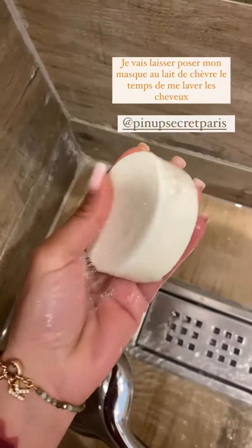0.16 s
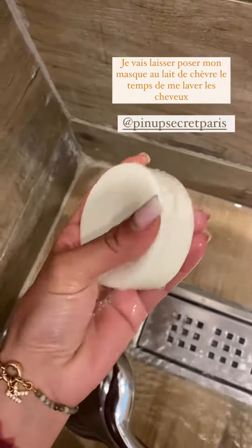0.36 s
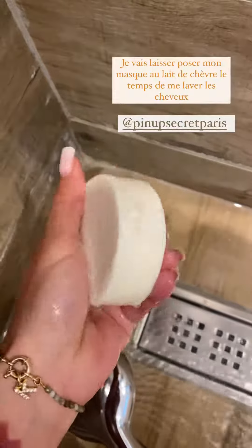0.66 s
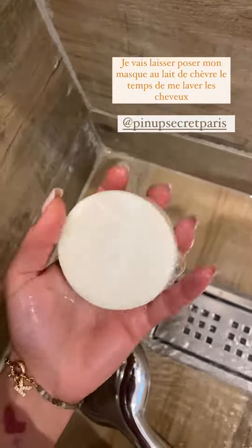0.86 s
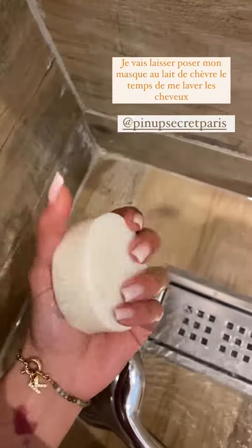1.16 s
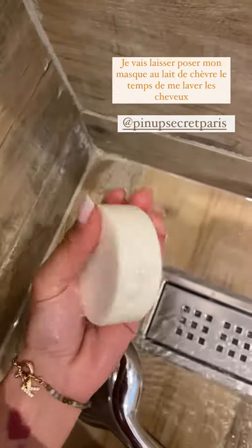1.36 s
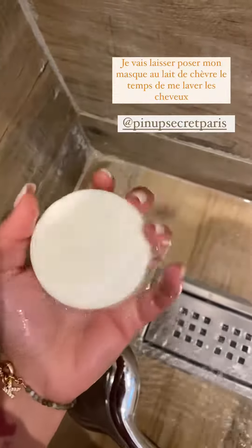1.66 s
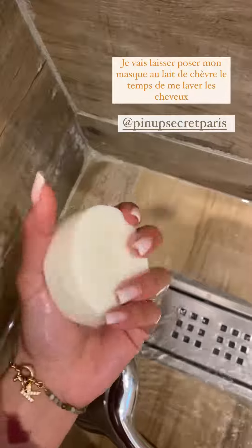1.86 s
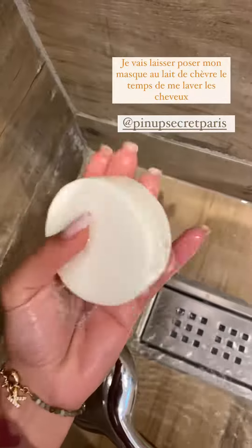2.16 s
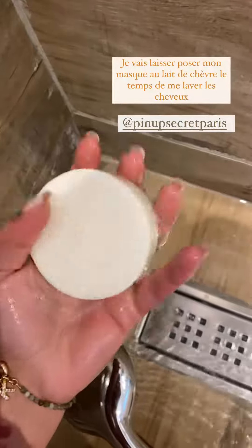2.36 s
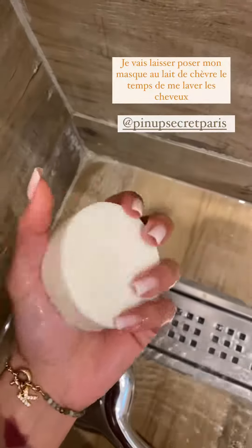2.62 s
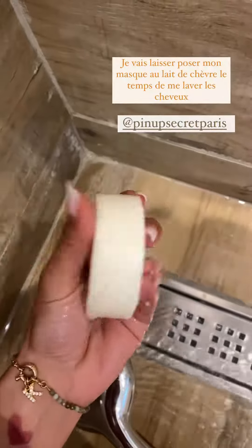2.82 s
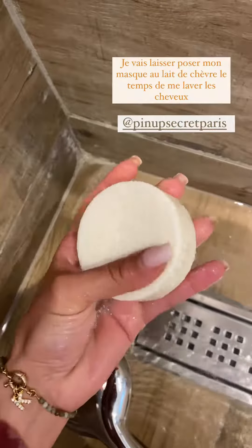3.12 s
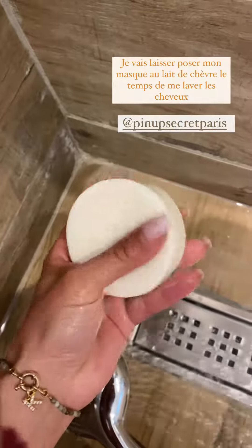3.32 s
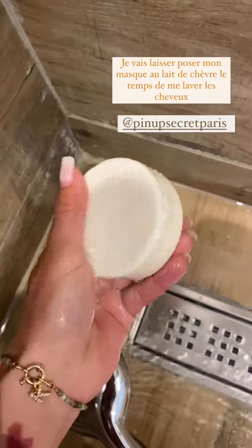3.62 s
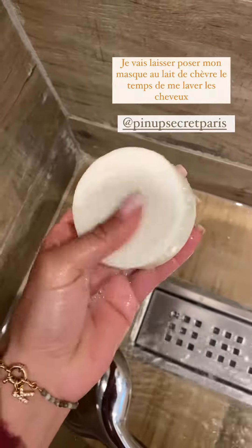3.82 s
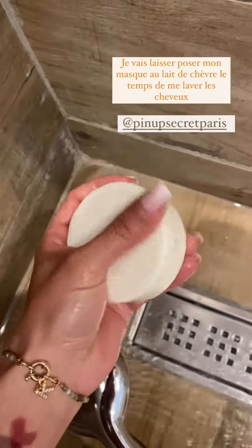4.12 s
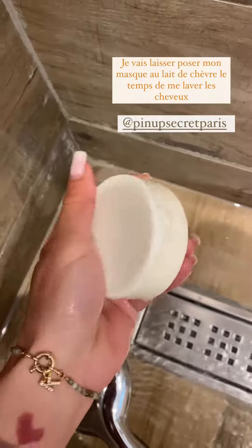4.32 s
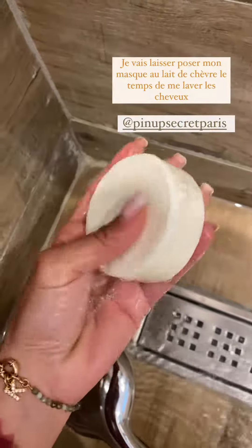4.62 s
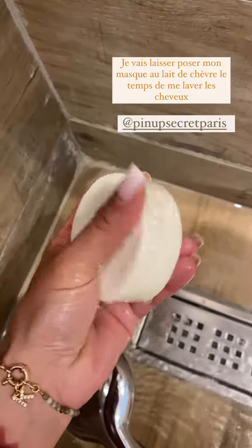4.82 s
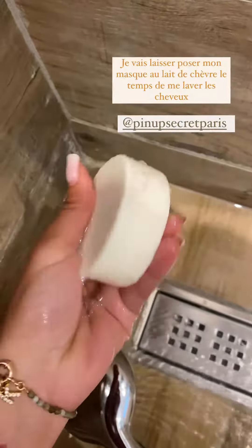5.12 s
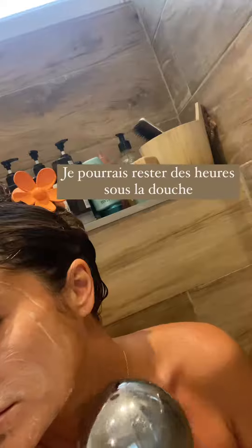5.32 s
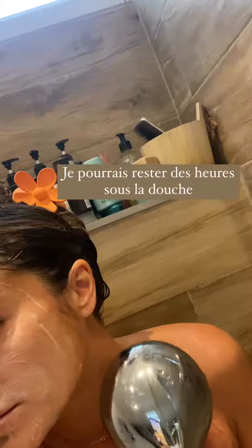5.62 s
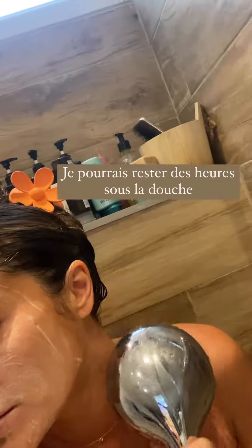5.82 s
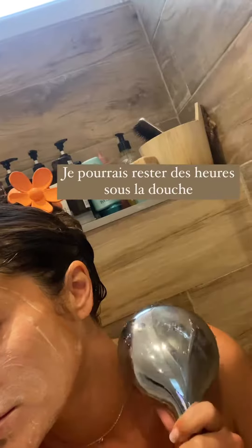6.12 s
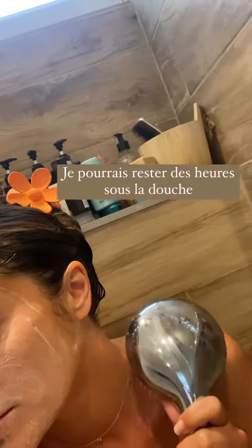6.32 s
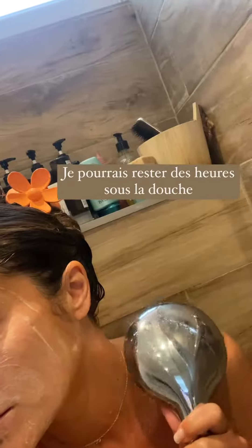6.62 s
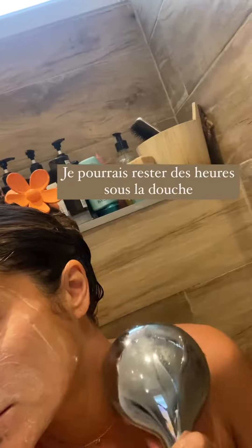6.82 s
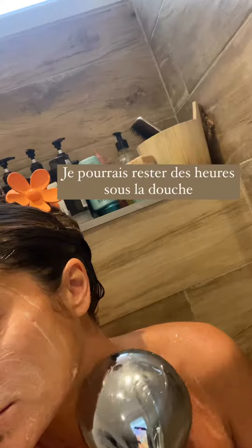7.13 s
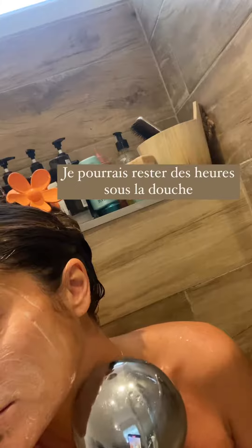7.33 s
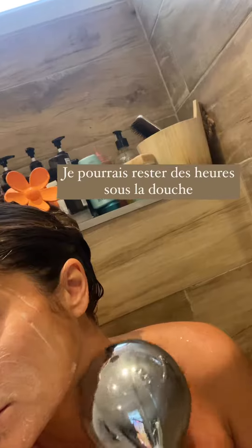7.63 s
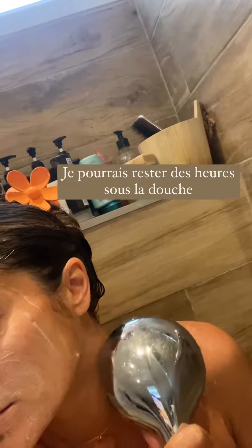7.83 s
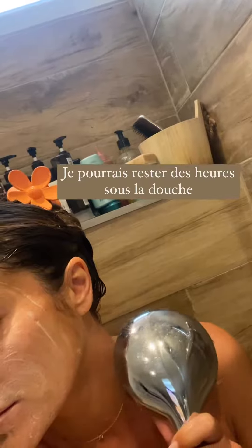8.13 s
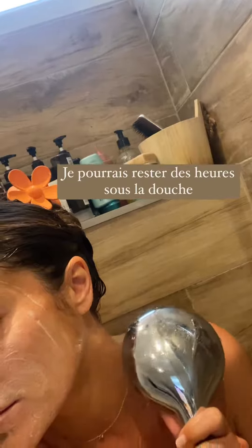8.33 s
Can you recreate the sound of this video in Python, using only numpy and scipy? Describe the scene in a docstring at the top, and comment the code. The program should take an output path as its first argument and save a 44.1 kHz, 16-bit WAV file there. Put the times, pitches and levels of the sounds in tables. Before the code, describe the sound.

A shower runs close to a phone in a tight, resonant bathroom stall. Dense, crisp hiss and drumming on the floor cut off sharply, restart almost at once and continue for several seconds. A second clean cut leads to water on a shoulder: less airy hiss, more mid-range patter, wet slaps, a bubbling pocket and brief rising gurgles until the abrupt end.

```python
"""Shower spray in a small tiled stall: random drop impacts and smooth noise excite the stall's resonances.
It drums on the floor; after a break it falls on skin, duller, with splats, gurgles and a bubbling pocket.
Splats are swarms of damped bubble chirps, gurgles gliding tones; the pocket and a drain cover ring as narrow
filtered noise. A phone with two microphone ports hears it. Each stretch stops abruptly with a very short
fading remnant, and the end of the floor stretch is also played ahead of it, before the first break."""
import sys
import numpy as np
from scipy import signal
from scipy.fft import rfft, irfft, next_fast_len
from scipy.io import wavfile
from scipy.ndimage import uniform_filter1d, map_coordinates

SR = 44100
rng = np.random.default_rng(int(sys.argv[2]) if len(sys.argv) > 2 else 0)


def persist_wave(psi):
    """Save psi, clipped to +-1, as 16-bit WAV."""
    counts = np.round(np.clip(psi, -1, 1) * 32767).astype(np.int16)
    wavfile.write(sys.argv[1], SR, np.atleast_2d(counts).T)


N = 373527

FLOOR_S, SKIN_S = (.8835, 5.187), (5.2715, 8.432)  # start and stop of each stretch (s)
AHEAD_S = 4.3886  # how much earlier the end of the floor stretch is first heard (s)
ZONE_HZ = (110, 900, 1700, 5000)  # borders of rumble | drumming | gurgle | spatter | hiss
TOP_HZ = 15680  # upper limit of the phone
SKIN_TOP_HZ = 5400  # slaps on the shoulder reach the phone without their treble
WANDER = 0.00252  # rms share by which the resonances slide as the hand-held phone moves
GRATE_HZ, GRATE_WIDTH_HZ = 3050, 62  # width at half amplitude
POCKET_HZ, POCKET_WIDTH_HZ = 1145, 56  # width at half amplitude
GURGLE_GLIDE = .06  # share by which the pitch rises over a bubble
# five values stand for the five zones: mean level (dB), then the share of the floor swell that each follows
FLOOR_DB, SKIN_DB = (-56.5, -43.5, -44.5, -39, -36), (-60, -43.5, -47.5, -38, -52.5)
FLOOR_FOLLOWS = (0.63, 0.07, 0.98, 0.25, 0.49)
# on skin each zone drifts (dB per s) and opens with a signed gush (dB) that settles (time constant in s)
SKIN_DRIFT_DB_S, GUSH_DB, GUSH_S = (5, 0.5, 1, -0.56, 0.2), (-3, 11.5, 1, -0.5, -13), 0.13

# Broad spectral colour between the resonances. Each row: frequency in Hz, density in dB, relative within a zone.
FLOOR_COLOUR = [(25, -103), (50, -91), (150, -89), (300, -76.5), (590, -88.5), (1000, -84.5), (2000, -87.5),
                (2800, -84.5), (5000, -74), (8500, -74.5), (9400, -80), (10000, -76.5), (12000, -85.5),
                (13500, -91.5), (15600, -104.2)]
SKIN_COLOUR = [(25, -99), (60, -83), (150, -91), (300, -100.7), (500, -91.5), (1500, -85), (2500, -73.5),
               (4500, -66), (5100, -73), (5900, -75), (6600, -85), (7300, -102), (8000, -108), (8700, -103),
               (10800, -111.4), (12000, -129.1)]
# Resonances of the stall heard from each place.
# Each row: frequency in Hz, half-power width in Hz, height in dB over the broad colour.
FLOOR_RESONANCES = [(86.3, 10.8, 28), (184, 7.8, 15.6), (231.7, 6.2, 15.6), (310.5, 10.3, 14.4),
                    (368.8, 11.3, 22.4), (433.8, 36, 23.2), (503, 14, 20.2), (650.6, 14.3, 23),
                    (774, 20, 22.7), (960, 11.3, 18.8), (1068, 23, 14.8), (1153.5, 47, 23.9), (1360, 16, 4),
                    (1404, 23, 16.2), (1500, 21, 20.8), (1681, 31, 19.4), (1620, 61, 15), (1820, 37, 18),
                    (2520, 340, 16.6), (2977, 15, 14.5), (3080, 23, 19), (3270, 180, 10), (3646, 137, 11),
                    (4124, 9.2, 16.7), (4220, 12, 16.3), (4348, 58, 15.4), (4867, 39, 13.8),
                    (5630, 53, 10.7), (5940, 380, 10.2), (6950, 43, 14), (7156, 31, 17), (7400, 320, 13.3),
                    (9095, 350, 12.8)]
SKIN_RESONANCES = [(189, 8.3, 19.8), (266, 17, 21.2), (390, 82, 20.2), (486.3, 13, 27.1), (561.8, 12, 26.3),
                   (632, 13.5, 20.2), (792.7, 26, 25), (929, 11, 23.2), (1031, 12, 30.5), (1148, 124, 21.6),
                   (1360, 38, 18.7), (1465, 74, 18.3), (1791, 23, 18.7), (2130, 127, 10.3), (2640, 72, 2.9),
                   (4150, 130, 5.4)]
# Relation of the two ports.
# Each row: frequency in Hz, left minus right in dB, likeness from 0 to 1, lead of the left in radians.
FLOOR_PORT_PAIR = [(40, -3.0, 0.95, -0.4), (150, -5.3, 0.92, -0.5), (240, -9.0, 0.99, -0.4),
                   (340, -14.2, 0.86, -0.9), (410, -6, 0.62, -3.5), (440, -9, 0.78, -4.6),
                   (520, 2.0, 0.9, -3.4), (670, -5.6, 0.92, -3.5), (800, -4.7, 0.81, -4.7),
                   (860, -0.9, 0.68, -3.7), (1030, 5.0, 0.54, -10.8), (1140, -2.0, 0.65, -9.4),
                   (1360, 2.4, 0.74, -11.4), (1940, -1.3, 0.62, -11.9), (2540, -0.5, 0.7, -9.8),
                   (4390, -2.9, 0.63, -10.9), (5280, -1.8, 0.68, -6.4), (10920, 0.8, 0.6, -3.5),
                   (11990, -0.2, 0.9, 1.0)]
SKIN_PORT_PAIR = [(40, 0.0, 0.99, 0.0), (240, 2.6, 0.97, -0.6), (340, 0.8, 0.93, -0.6),
                  (470, 3.6, 0.98, -0.8), (600, -0.5, 0.95, -0.6), (840, 4.2, 0.9, -0.8),
                  (990, 2.6, 0.47, -0.2), (1180, 3.4, 0.66, -2.4), (1290, -1.0, 0.53, -0.9),
                  (2150, 1.5, 0.73, -1.2), (2560, 1.2, 0.38, -1.4), (6160, -0.2, 0.87, -3.1),
                  (9580, 0.1, 0.9, -5.5)]
# Run-off water slapping down. Each row: peak in seconds, level in dB, bubble pitch in Hz, build-up in seconds,
# decay by 60 dB in seconds, pitch scatter as a share.
SPLAT_EVENTS = [(5.297, -21.5, 2350, 0.004, 0.15, 0.069), (5.337, -19.5, 2360, 0.00202, 0.088, 0.096),
                (5.404, -20, 2700, .003, 0.11, 0.16), (5.415, -13, 3140, .004, .15, 0.19),
                (5.447, -21, 2970, 0.0069, 0.2, 0.098), (5.510, -12, 3600, 0.0018, 0.13, 0.24),
                (5.523, -25, 3650, .002, .12, 0.077), (5.571, -24, 2200, .004, .1, 0.077),
                (5.766, -18, 3730, 0.0029, 0.2, 0.23), (5.802, -14, 2860, .002, 0.12, 0.18),
                (5.817, -16, 2960, .002, .15, 0.1), (5.843, -27, 2850, 0.0048, 0.14, 0.11),
                (5.951, -25.5, 2320, 0.0035, 0.12, .08), (5.997, -18.5, 4100, 0.0036, 0.1, 0.09),
                (6.026, -25, 3050, .002, .08, 0.093), (6.06, -23, 4130, .006, 0.13, .06),
                (6.122, -28, 4300, .003, .12, .08), (6.176, -28, 2150, .003, .1, 0.073),
                (6.19, -26, 4000, .002, .06, 0.087), (6.257, -25, 3750, .002, .1, 0.11),
                (6.428, -16, 3420, 0.0025, 0.13, 0.28), (6.552, -16.5, 4340, .004, 0.079, 0.07),
                (6.665, -13.5, 2610, 0.0012, .12, 0.084), (6.681, -20, 2400, 0.0028, 0.22, 0.072),
                (6.751, -16.5, 2850, 0.0036, .15, 0.23), (6.864, -29, 2000, 0.0016, .06, 0.05),
                (6.905, -25, 4200, .004, 0.22, .08), (6.995, -17.5, 2830, 0.0033, .25, 0.058),
                (7.091, -21.5, 2480, 0.00197, 0.093, .1), (7.411, -27, 4290, .002, 0.11, .1),
                (7.542, -23, 4270, .002, 0.12, 0.088), (7.643, -15, 3120, 0.0016, 0.19, 0.26),
                (7.682, -31, 1900, .002, 0.095, 0.09), (7.762, -23, 4200, .002, .15, 0.082),
                (7.839, -19.5, 3700, .002, 0.12, 0.17), (7.868, -24, 2820, .002, 0.079, 0.1),
                (7.888, -26, 3560, .003, .14, 0.25), (8.002, -20, 3800, 0.0032, .15, 0.165),
                (8.268, -18, 3220, .004, .13, 0.085)]
# Ringing of the metal drain cover under the spray. Each row: time in seconds, level in dB.
GRATE_LEVELS = [(.9, -50), (1.4, -47), (1.9, -48), (2.5, -49.5), (3.0, -48), (3.3, -43.5), (3.45, -43),
                (3.57, -40), (3.7, -46), (3.9, -41.5), (4.4, -47), (4.9, -46.5), (5.18, -51)]
# Bubbling of a pocket of water between head and skin. Each row: time in seconds, level in dB.
POCKET_LEVELS = [(5.9, -68), (6.2, -51), (6.45, -50), (6.56, -49), (6.61, -47), (6.66, -45), (7.0, -53),
                 (7.3, -53), (7.6, -60), (7.8, -48), (8.0, -51), (8.3, -49), (8.43, -53)]
# Swell of the spray on the floor. Each row: time in seconds, level in dB about the mean.
FLOOR_SWELL_LEVELS = [(.9, 0.5), (2.2, 1.6), (3.5, 3), (4.3, 2.5), (5.17, 1.5)]
# Low zones on the floor. Each row: time in seconds, rumble in dB, drumming in dB, both added to mean and swell.
FLOOR_LOW_LEVELS = [(.9, -1.5, 1.3), (1.5, 0, 2), (2.0, -2, -2.5), (2.3, -2.5, -3.5), (2.5, -0.5, 1.2),
                    (3.1, -1, 0.5), (3.3, 6, 1.5), (3.7, 4, 0.5), (4.1, -1.8, -0.4), (4.5, 6, 0),
                    (4.9, 8, -0.6), (5.17, -6.5, 1.1)]
# Lower zones on skin. Each row: time in seconds, rumble, drumming and gurgle in dB about the drift.
SKIN_LOW_LEVELS = [(5.3, -1, -4, 2), (5.57, -3, 2, 0.5), (5.85, -1, 1.2, 2.5), (6.13, -3, 0.5, 2.5),
                   (6.4, -5, -0.5, 0.5), (6.61, -7.5, -3, 3), (7.05, -1, 2.1, 2), (7.3, -2, -1, 2),
                   (7.6, -3, 0.5, 1.5), (8.1, -7, 0, 1.5), (8.43, 3, -1.5, 2)]
# Upper zones on skin. Each row: time in seconds, spatter and hiss in dB about the drift.
SKIN_HIGH_LEVELS = [(5.28, 1, 6), (5.5, 0.5, 1.5), (5.75, 2, -5), (5.95, 1, 2), (6.2, -1, 0.5),
                    (6.45, -1, 2.5), (6.7, -0.5, 0), (6.95, 1.5, 1), (7.2, 0.5, 1), (7.45, -0.5, -3),
                    (7.7, 0.5, -1.5), (7.95, 0.5, 1.5), (8.2, 0.5, -0.5), (8.43, -0.5, 2)]
# Big bubbles bursting out of the pocket. Each row: middle in seconds, level in dB, pitch in Hz, length in seconds.
GURGLE_EVENTS = [(5.295, -30.5, 765, .05), (5.35, -35, 700, .05), (6.548, -32, 1180, .03),
                 (6.578, -34, 1114, 0.032), (6.608, -25, 1142, 0.045), (6.722, -31, 1107, 0.07)]


def amp(db):
    """Level and amplitude: 20 dB is a factor of ten."""
    return 10 ** (np.asarray(db) / 20)


def axes(span):
    """Sampling: a stretch of n samples has n / 2 + 1 frequencies; returns n, Hz and seconds."""
    n = next_fast_len(int((span[1] - span[0]) * SR) + 2) // 2 * 2
    return n, np.arange(n // 2 + 1) * SR / n, span[0] + np.arange(n) / SR


def walk(n, rate):
    """Slow random modulation: levels held for 1 / rate s and smoothed twice, with unit spread."""
    hold = int(SR / rate)
    levels = np.repeat(rng.standard_normal(n // hold + 2), hold)
    slewed = uniform_filter1d(uniform_filter1d(levels, hold), hold)[:n]
    return slewed / slewed.std()


def ports(direct, diffuse, hz, table):
    """Partial coherence: the right port hears a shifted share of the left plus its own reverberant field."""
    f, *columns = np.transpose(table)
    pan_db, like, lead = (np.interp(hz, f, c) for c in columns)
    left_power = 1 / (1 + amp(-pan_db) ** 2)
    right = like * np.exp(-1j * lead) * direct + np.sqrt(1 - like ** 2) * diffuse
    return np.array([np.sqrt(left_power) * direct, np.sqrt(1 - left_power) * right])


def place(x, span, left_db=-15, fade_db_s=1500, faint_db=-42, faint_db_s=300):
    """Gating: a sharp start, and at the stop a remnant of two decays, the fainter one slower."""
    out, i = np.zeros((2, N)), int(span[0] * SR)
    n = int((span[1] - span[0]) * SR)
    tail = min(int(.05 * SR), N - i - n)
    opening = np.arange(n) / 40
    closing = np.arange(n)[::-1] / 40 + amp(left_db)
    out[:, i:i + n] = x[:, :n] * np.minimum(opening, closing).clip(0, 1)
    t = np.arange(tail) / SR
    remnant = amp(left_db - fade_db_s * t) + amp(faint_db - faint_db_s * t)
    out[:, i + n:i + n + tail] = x[:, n - tail:n] * remnant
    return out


def ringing(span, centre_hz, width_hz, curve, table, puff_db=1.5):
    """Resonance: noise through one narrow peak rings at its pitch, here in uneven puffs."""
    n, hz, t = axes(span)
    peak = 1 / (1 + (2 * (hz - centre_hz) / width_hz) ** 2)
    direct, diffuse = rfft(rng.standard_normal((2, n))) * peak
    x = irfft(ports(direct, diffuse, hz, table), n)
    level_db = np.interp(t, *np.transpose(curve)) + puff_db * walk(n, 25.08)
    return x / x.mean(axis=0).std() * amp(level_db)


def drain_cover():
    """Forced vibration: the spray keeps the metal drain cover ringing."""
    return ringing(FLOOR_S, GRATE_HZ, GRATE_WIDTH_HZ, GRATE_LEVELS, FLOOR_PORT_PAIR)


def water_pocket():
    """Cavity resonance: a pocket of water between head and skin bubbles around one pitch."""
    return ringing(SKIN_S, POCKET_HZ, POCKET_WIDTH_HZ, POCKET_LEVELS, SKIN_PORT_PAIR)


def gurgles(span, table):
    """Bubble oscillation: each big bubble is a swelling and fading tone that rises as it surfaces."""
    n, hz, t = axes(span)
    x = np.zeros(n)
    for s, db, pitch_hz, length in GURGLE_EVENTS:
        u = np.clip((t - s) / length, -.5, .5)
        swell = np.cos(np.pi * u) ** 2
        cycles = pitch_hz * length * u * (1 + GURGLE_GLIDE * u / 2)
        x += amp(db) * swell * np.sin(2 * np.pi * cycles)
    return irfft(ports(rfft(x), 0, hz, table), n)


def splat(hz, rise, t60, scatter, chance, cycles=6.1, glide=0.022, blow_db=-1.5, tail_db=-4):
    """Bubble entrainment: a slap strikes a swarm of upward-chirping bubbles that builds and dies away."""
    t = np.arange(400) / SR
    late, pitch, size = chance.T[:, :, None]
    at = np.linspace(-1.5 * rise, 0.38 * t60, len(chance))[:, None] + 0.0025 * late
    at[0], pitch[0], size[0] = 0, 0, 0  # the blow itself
    f = hz * np.exp(scatter * np.clip(pitch, -1.7, 1.7))
    envelope = np.clip(t * f / 1.9, 0, 1) * np.exp(-t * f / cycles)
    envelope = envelope * np.cos(np.pi / 2 * t / t[-1])  # ends at silence
    bubbles = envelope * np.sin(2 * np.pi * f * t * (1 + glide * t * f / cycles))
    course = np.where(at < 0, np.exp(at / max(rise, .001)), amp(-60 * at / t60))
    level = amp(tail_db + 3.9 * np.minimum(size, 1.5)) * course
    level[0] = amp(blow_db)
    out = np.zeros(int(.3 * SR))
    # the blow starts 30 ms in, leaving room for the build-up
    index = (np.clip(at + .03, 0, .28) * SR).astype(int) + np.arange(len(t))
    np.add.at(out, index, bubbles * level)
    return out


def splats(rows, span, table, top_hz):
    """Superposition: all slaps of a stretch add up, lose their treble and reach the two ports."""
    n = next_fast_len(int((span[1] - span[0] + .4) * SR)) // 2 * 2
    dry, hz = np.zeros((2, n)), np.arange(n // 2 + 1) * SR / n
    chance = rng.standard_normal((len(rows), 2, 72, 3))  # 72 bubbles, drawn apart for direct and diffuse
    for (s, db, pitch_hz, rise, t60, scatter), pair in zip(rows, chance):
        i = int((s - span[0]) * SR)
        for k in range(2):
            slap = splat(pitch_hz, rise, t60, scatter, pair[k])
            dry[k, i:i + len(slap)] += amp(db) * slap
    dull = 1 / (1 + (hz / top_hz) ** 12)
    direct, diffuse = rfft(dry) * dull
    return irfft(ports(direct, diffuse, hz, table), n)[:, int(.032 * SR):]  # brings the peaks to their times


def stray(span, per_s, db, hz, spread_db=2.5, t60=0.14, scatter=0.1):
    """Random arrivals: rows of small slaps at chance times, levels and pitches within an octave."""
    length = span[1] - span[0]
    chance = rng.random((int(per_s * length), 3))
    return [(span[0] + when * length, db - spread_db * np.log(size + 0.043), hz * 2 ** (pitch - .5),
             .003, t60, scatter) for when, size, pitch in chance]


def colour(hz, tilt, modes):
    """Minimum phase: a broad tilt with resonance peaks made causal by folding its cepstrum."""
    tilt = np.array(tilt)
    power = 1 + sum(amp(db) ** 2 / (1 + (2 * (hz - f) / w) ** 2) for f, w, db in modes)
    broad = amp(np.interp(np.log(hz + 1), np.log(tilt[:, 0]), tilt[:, 1]))
    cepstrum = irfft(np.log(broad * np.sqrt(power)))
    cepstrum[1:len(cepstrum) // 2] *= 2
    cepstrum[len(cepstrum) // 2 + 1:] = 0
    return np.exp(rfft(cepstrum))


def drops(n, per_s, spread_db, share):
    """Shot noise: uneven drop impacts over the smooth wash of far ones, in two unrelated draws."""
    size = amp(spread_db * np.minimum(rng.exponential(size=(2, n)), 4))  # limits the loudest single impacts
    hits = (rng.random((2, n)) < per_s / SR) * rng.choice([-1, 1], (2, n)) * size
    wash = rng.standard_normal((2, n))
    return np.sqrt(share) * hits / hits.std() + np.sqrt(1 - share) * wash


def steady(x, over_s=0.33):
    """Level normalisation: both channels scaled so that their mean keeps rms 1 in the long run."""
    return x / np.sqrt(uniform_filter1d(x.mean(axis=0) ** 2, int(over_s * SR)))


def floor_flow(t):
    """Source strength on the floor: zone levels in dB from a common swell and the wander of the low zones."""
    s, *lows = np.transpose(FLOOR_LOW_LEVELS)
    swell = np.interp(t, *np.transpose(FLOOR_SWELL_LEVELS))
    db = np.array(FLOOR_DB)[:, None] + np.outer(FLOOR_FOLLOWS, swell)
    db[:2] += [np.interp(t, s, c) for c in lows]
    return db


def skin_flow(t):
    """Source strength on skin: zone levels in dB from a drift, an opening gush and the wander of each zone."""
    db = np.array(SKIN_DB)[:, None] + np.outer(SKIN_DRIFT_DB_S, t - np.mean(SKIN_S))
    db += np.outer(GUSH_DB, np.exp(-(t - SKIN_S[0]) / GUSH_S))
    s, *lows = np.transpose(SKIN_LOW_LEVELS)
    db[:3] += [np.interp(t, s, c) for c in lows]
    s, *highs = np.transpose(SKIN_HIGH_LEVELS)
    db[3:] += [np.interp(t, s, c) for c in highs]
    return db


def dapple(x, depth_db, from_hz=1800):
    """Modulation in time and frequency: narrow strips, mostly above from_hz, dip briefly and separately."""
    hz, _, z = signal.stft(x, SR, nperseg=1024)
    field = uniform_filter1d(rng.standard_normal(z.shape[1:]), size=5, axis=1)
    field = uniform_filter1d(field, size=2, axis=0)
    treble = 1 / (1 + (from_hz / (hz[:, None] + 1)) ** 4)
    gain = amp(depth_db * np.minimum(field / field.std(), .6) * treble)
    gain = gain / np.sqrt(np.mean(gain ** 2, axis=1, keepdims=True))
    return signal.istft(z * gain, SR, nperseg=1024)[1]


def spray(span, flow, tilt, modes, table, surge_db, patchy_db, flicker_db, share):
    """Excited resonances: drops ring the stall; bands surge together, in patches and alone as jets wander."""
    n, hz, t = axes(span)
    direct, diffuse = rfft(drops(n, 6000, 3.0, share)) * colour(hz, tilt, modes)
    wet = ports(direct, diffuse, hz, table)
    zones = np.zeros((len(ZONE_HZ) + 1, 2, n))
    octave = np.log2(hz + 1)

    def coarse(rate):
        """Decimation: a slow walk needs only every 32nd sample."""
        return walk(n, rate)[::32]

    surge, patch = coarse(11.0), coarse(6.5)
    for centre in np.arange(4, 14.5, .5):  # overlapping half-octave bands
        band = np.clip(1 - abs(octave - centre) * 2, 0, 1)
        patch = (patch + coarse(5.26)) / np.sqrt(2)  # neighbouring bands share their drift
        db = surge_db * surge + patchy_db * patch + flicker_db * coarse(22.14)
        gain = np.repeat(amp(db), 32)[:n]
        zones[np.searchsorted(ZONE_HZ, 2 ** centre)] += gain * irfft(wet * band, n)
    heard = sum(steady(zone) * amp(db) for zone, db in zip(zones, flow(t)))
    # uneven reading speed slides all resonances together
    at = np.arange(n) + np.cumsum(WANDER * walk(n, 7))
    at = at * (n - 1) / at[-1]
    return np.array([map_coordinates(channel, [at], mode="mirror") for channel in heard])


def floor_spray():
    """Excited resonances of the stall heard from the floor: bright drumming, slightly uneven in the treble."""
    x = spray(FLOOR_S, floor_flow, FLOOR_COLOUR, FLOOR_RESONANCES, FLOOR_PORT_PAIR,
              surge_db=0.28, patchy_db=0.78, flicker_db=0.61, share=0.42)
    return dapple(x, 5.5)


def skin_spray():
    """Excited resonances of the stall heard from the skin: a duller spray, its treble more uneven."""
    x = spray(SKIN_S, skin_flow, SKIN_COLOUR, SKIN_RESONANCES, SKIN_PORT_PAIR,
              surge_db=0.46, patchy_db=0.81, flicker_db=1.32, share=0.32)
    return dapple(x, 11.0, from_hz=4200)


def scene():
    """Superposition: the sources of each stretch add up, and the end of the floor stretch also sounds ahead."""
    floor = place(floor_spray(), FLOOR_S)
    floor += place(drain_cover(), FLOOR_S)
    floor += place(splats(stray(FLOOR_S, 10, -33, 4050), FLOOR_S, FLOOR_PORT_PAIR, 9000), FLOOR_S)

    skin = place(skin_spray(), SKIN_S)
    slaps = list(SPLAT_EVENTS) + stray(SKIN_S, 41, -38.5, 3020)
    skin += place(splats(slaps, SKIN_S, SKIN_PORT_PAIR, SKIN_TOP_HZ), SKIN_S)
    skin += place(water_pocket(), SKIN_S)
    skin += place(gurgles(SKIN_S, SKIN_PORT_PAIR), SKIN_S)

    ahead, shift = np.zeros_like(floor), int(AHEAD_S * SR)
    ahead[:, :-shift] = floor[:, shift:]
    return ahead + floor + skin


def record(dry):
    """Band limiting: the phone cuts everything above its top with a steep low-pass filter."""
    return signal.sosfilt(signal.ellip(12, .2, 80, TOP_HZ, fs=SR, output="sos"), dry)


dry = scene()
out = record(dry)
persist_wave(out)
```